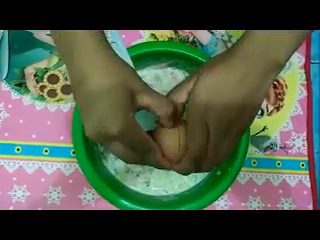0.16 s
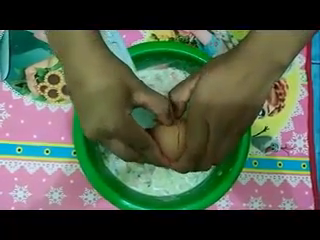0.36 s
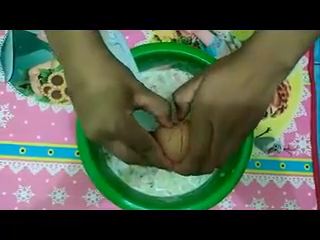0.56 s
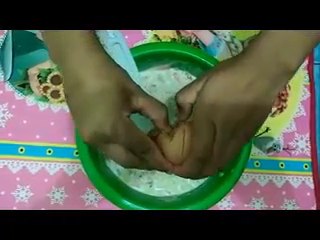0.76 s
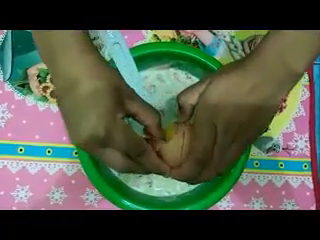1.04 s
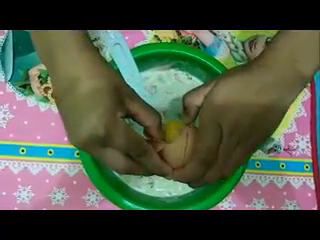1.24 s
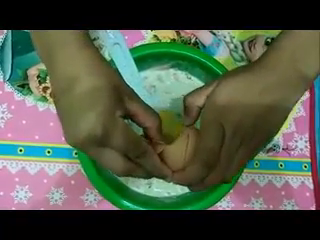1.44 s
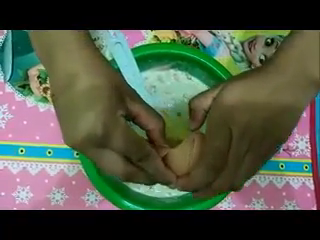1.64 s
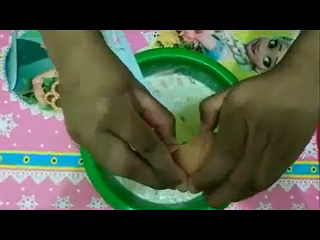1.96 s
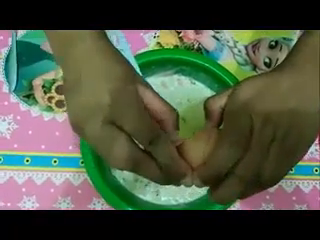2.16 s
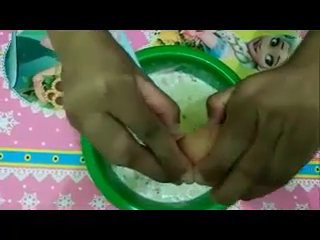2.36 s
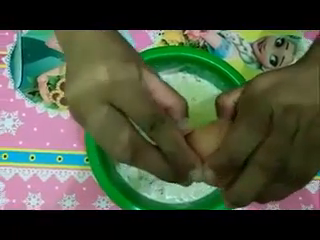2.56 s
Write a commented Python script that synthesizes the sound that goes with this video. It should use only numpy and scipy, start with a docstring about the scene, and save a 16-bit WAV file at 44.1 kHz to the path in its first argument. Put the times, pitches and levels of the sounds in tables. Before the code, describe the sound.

An egg is knocked on a plastic bowl, then its shell crunches and squelches apart

```python
"""Over a faint kitchen background with soft low bumps, an egg is knocked on the rim of a plastic bowl.
Thumbs then crunch into the shell and pull it apart: filtered noise impulses make snaps and crumbling.
Short tone bursts pop in the wet inside, and damped modes ring the bowl at each knock.
Swarms of tiny pops then squelch, lower on the whole as the shell opens; bowl air and room respond throughout.
The sound is close, and its top is cut steeply."""
import sys
import numpy as np
from scipy import signal
from scipy.fft import rfft, irfft, next_fast_len
from scipy.io import wavfile

SR = 44100
rng = np.random.default_rng(int(sys.argv[2]) if len(sys.argv) > 2 else 0)


def unload_audio(sound):
    """Save the sound as a 16-bit wav file, at the path given as the first command line argument."""
    columns = np.transpose(np.atleast_2d(sound))
    # keep every value between -1 and 1, then stretch to whole-number steps
    steps = np.round(np.clip(columns, -1, 1) * 32767)
    wavfile.write(sys.argv[1], SR, steps.astype(np.int16))


N = 119070
TIME = np.arange(N) / SR  # s


def from_db(db):
    """Logarithmic level: decibels become amplitude gain."""
    return 10 ** (np.asarray(db) / 20)


def rms_one(x):
    """Power normalisation: scale to unit root mean square."""
    return x / np.sqrt(np.mean(x ** 2) + 1e-20)


def at_hz(points, hz, axis=1):
    """Logarithmic frequency scale: interpolate a column of a table along it."""
    p = np.array(points)
    return np.interp(np.log(np.maximum(hz, 1)), np.log(p[:, 0]), p[:, axis])


def add(out, s, sound):
    """Superposition: mix a sound in at a time in seconds."""
    i = max(int(s * SR), 0)
    out[i:i + len(sound)] += sound[:max(N - i, 0)]


def colour(x, spectrum):
    """Minimum-phase filtering: a causal response from the cepstrum; white noise keeps its power."""
    size = 2 * next_fast_len(N)
    gain = rms_one(from_db(at_hz(spectrum, np.fft.rfftfreq(size, 1 / SR))))
    cepstrum = irfft(np.log(gain))
    # Folding the cepstrum onto positive time makes the filter causal
    cepstrum[1:size // 2] *= 2
    cepstrum[size // 2 + 1:] = 0
    return irfft(rfft(x, size) * np.exp(rfft(cepstrum)))[:N]


# steady background of the kitchen: (frequency [Hz], relative level [dB])
BACKGROUND_SPECTRUM = [(20, 0.5), (65, 1), (110, 0), (200, -8), (550, -12), (780, -0.5), (1050, -6),
                       (1400, -10), (2200, -22), (3500, -26), (10000, -28), (12000, -14)]
BACKGROUND_DB = -59
# faint hollow rush: (time [s], level [dB])
RUSH_LEVELS = [(0, -68.5), (.45, -63.5), (.7, -63), (1.95, -86.5), (2.35, -55.5), (2.46, -64), (2.55, -57),
               (2.7, -58.5)]
# colour of the hollow rush: (frequency [Hz], relative level [dB])
RUSH_SPECTRUM = [(150, -24), (450, -10.5), (690, -17), (765, 4.5), (850, -5.5), (1050, -15), (1700, -28.5),
                 (3000, -40)]
# soft low bumps: (time of the height [s], level [dB], Gaussian width [s], pitch [Hz])
BUMPS = [(0.041, -54.5, 0.0092, 95), (0.765, -51.5, 0.0085, 80), (2.185, -48, 0.013, 66),
         (2.262, -47, 0.027, 65.8), (2.315, -47, 0.023, 74), (2.419, -48.5, 0.0057, 69),
         (2.559, -45, 0.019, 68.6), (2.61, -48.5, 0.019, 68), (2.59, -56, 0.015, 193)]
BUMP_OVERTONE_RATIO, BUMP_OVERTONE_DB = 1.65, -14


def background():
    """Stationary noise and Gaussian tone bursts: steady air, a faint hollow rush and low bumps."""
    air = from_db(BACKGROUND_DB) * colour(rng.standard_normal(N), BACKGROUND_SPECTRUM)
    rush_level = from_db(np.interp(TIME, *np.transpose(RUSH_LEVELS)))
    out = air + colour(rng.standard_normal(N), RUSH_SPECTRUM) * rush_level
    for s, db, width, hz in BUMPS:
        phase = 2 * np.pi * hz * (TIME - s)
        tone = np.sin(phase) + from_db(BUMP_OVERTONE_DB) * np.sin(BUMP_OVERTONE_RATIO * phase)
        out += from_db(db) * np.exp(-.5 * ((TIME - s) / width) ** 2) * tone
    return out


# spells of fine crumbling as the shell gives way, before colouring:
# (time of the height [s], level [dB], rise time constant [s], fall time constant [s])
CRUMBLING = [(0, -60, .01, 0.036), (0.259, -23.5, 0.0058, 0.0062), (0.507, -50, 0.0084, 0.017),
             (0.624, -41, 0.0066, 0.011), (0.799, -25, 0.013, 0.021), (.94, -36, 0.047, 0.02),
             (0.984, -35, 0.0064, 0.029), (1.259, -37, 0.029, 0.047), (1.386, -43, 0.035, 0.042),
             (1.571, -40.5, 0.0072, 0.056), (1.792, -44.5, 0.014, 0.016), (2.021, -48, 0.0031, 0.0074),
             (2.174, -45.5, 0.05, 0.032)]
GRAINS_PER_S, GRAIN_SPREAD_DB = 800, 4.0  # mean rate; scale of the uneven sizes


def crunch():
    """Random impulse process: dense uneven grains build and die away with each press."""
    level = 0
    for s, db, rise, fall in CRUMBLING:
        level = level + from_db(db) * np.exp(-np.maximum((s - TIME) / rise, (TIME - s) / fall))
    sizes = from_db(GRAIN_SPREAD_DB * np.minimum(rng.exponential(1, N), 3))
    signed_sizes = sizes * rng.choice([-1, 1], N)
    grains = signed_sizes * (rng.random(N) < GRAINS_PER_S / SR)
    return level * rms_one(grains)


def burst(rise_s, decay_s):
    """Transient envelope: a rounded rise is followed by a free exponential decay."""
    t = np.arange(SR // 40) / SR
    rise = np.sin(np.pi / 2 * np.minimum(t / rise_s, 1)) ** 2
    return rise * np.exp(-np.maximum(t - rise_s, 0) / decay_s)


BREAKS_PER_S = 7000  # mean rate


def flurry(envelope):
    """Random impulse burst: separate tiny breaks of uneven size share their envelope's energy."""
    n = len(envelope)
    breaks = rng.standard_normal(n) * (rng.random(n) < BREAKS_PER_S / SR)
    return rms_one(envelope * breaks) * np.sqrt(np.mean(envelope ** 2))


# single fractures of the shell, before the trims below:
# (time [s], relative level [dB], body relative to bright edge [dB])
FRACTURES = [(0.1957, -37.5, -12), (0.223, -14, -9.5), (0.2448, -9, -8), (0.2513, -11, -11),
             (0.2538, -12, -5), (0.2576, -18.5, 3), (0.3793, -25.5, -6.5), (0.4909, -42.5, 0.5),
             (0.5563, -33.5, -10), (0.607, -30, -7.5), (0.6148, -29, -4), (0.626, -56, -22),
             (0.749, -24, -6), (0.7555, -45.5, 16), (0.767, -18, -18), (0.786, -17, -11), (0.796, -36, 1.5),
             (0.8055, -17.5, -3.5), (0.8411, -29, -7), (0.848, -26, -17), (0.8883, -20, -19),
             (0.8902, -23.5, -1), (0.9147, -17, -10.5), (0.946, -34, -3), (0.9587, -25.5, -6),
             (0.9692, -15, -28), (0.9714, -16, 2.5), (0.9712, -16.5, -22), (1.002, -39.5, 14),
             (1.073, -30.5, -7.5), (1.0828, -31.5, -28), (1.1764, -28, -6), (1.1877, -32, -7),
             (1.1923, -38, 3), (1.2259, -14.5, -3.5), (1.2451, -25.5, 5.5), (1.2694, -24, -3),
             (1.4038, -21.5, -7.5), (1.4135, -28, -9.5), (1.4454, -31.5, -2.5), (1.541, -27.5, -6.5),
             (1.5674, -20.5, -18), (1.6628, -40.5, -2.5), (1.6916, -37, -4.5), (1.7851, -30, -4),
             (1.79, -36, -1), (2.063, -42, -0.5), (2.1208, -14.5, -8), (2.1311, -20, -1),
             (2.1683, -17.5, -8.5), (2.2229, -16, -19), (2.2327, -21, -11), (2.4036, -39.5, -2.5),
             (2.496, -45, -11.5)]
SNAP_DB, SNAP_BODY_DB, CRUNCH_BODY_DB = -2.5, -2, -4  # trims: edge of snaps, body of snaps, body of crunch
SNAP_RISE_S, SNAP_DECAY_S = .0014, .0026  # decay is a time constant
# bright edge of breaking shell: (frequency [Hz], relative level [dB])
EDGE_SPECTRUM = [(3000, -20), (7000, -27), (8200, -7), (8900, -1), (9500, 2.5), (9950, -3), (10400, 1.5),
                 (11000, -13.5), (12000, -4)]
# duller body of breaking shell: (frequency [Hz], relative level [dB])
BODY_SPECTRUM = [(100, -24.5), (450, -11.5), (1100, -4.5), (1900, 0), (2650, -4), (3700, -11), (4400, -7),
                 (5700, -3.5), (7500, -3.5), (10000, -4.5)]


def shell():
    """Brittle fracture: flurries of tiny breaks and crumbling have a bright edge and a duller body."""
    edge, body = crunch(), from_db(CRUNCH_BODY_DB) * crunch()
    envelope = burst(SNAP_RISE_S, SNAP_DECAY_S)
    for s, db, body_db in FRACTURES:
        start = s - SNAP_RISE_S / 2
        add(edge, start, from_db(db + SNAP_DB) * flurry(envelope))
        add(body, start, from_db(db + body_db + SNAP_BODY_DB) * flurry(envelope))
    return colour(edge, EDGE_SPECTRUM) + colour(body, BODY_SPECTRUM)


# air resonances in the hollow of the bowl: (frequency [Hz], gain at resonance [dB], T60 [s])
AIR_RESONANCES = [(1387, -7.5, 0.055), (1856, -2.5, 0.2), (2134, -11.5, 0.2), (2520, -3, .09)]


def hollow(x):
    """Cavity resonance: narrow air modes of the bowl are set ringing by the egg."""
    t, response = TIME[:SR // 2], 0
    for hz, db, t60 in AIR_RESONANCES:
        unit_gain = 2 * np.log(1000) / (t60 * SR)  # makes the gain at resonance near one
        response = response + from_db(db - 60 * t / t60) * np.cos(2 * np.pi * hz * t) * unit_gain
    return signal.fftconvolve(x, response)[:N]


# reverberation of the kitchen: (frequency [Hz], relative level [dB], T60 [s])
REVERBERATION = [(300, -5, 0.39), (725, -14, 0.49), (1510, -7, 0.19), (2207, -11.5, 0.36),
                 (4140, -8.5, 0.29), (10800, -12, 0.22)]
ROOM_ONSET_S = .0014


def kitchen():
    """Diffuse reverberation: the noise response decays at its own rate in each octave."""
    t, response = TIME[:SR // 2], 0
    for low in 180 * 2. ** np.arange(6):
        centre = low * np.sqrt(2)
        octave = signal.butter(2, [low, 2 * low], "band", fs=SR, output="sos")
        band = signal.sosfilt(octave, rng.standard_normal(len(t)))
        decay = np.exp(-np.log(1000) * t / at_hz(REVERBERATION, centre, axis=2))
        envelope = decay * (1 - np.exp(-(t / ROOM_ONSET_S) ** 2))
        level = from_db(at_hz(REVERBERATION, centre))
        response = response + level * band * envelope / np.linalg.norm(envelope)
    return response


# small air pockets popping in the wet egg, before the trim: (time [s], relative level [dB], pitch [Hz])
AIR_POCKETS = [(0.223, -26.5, 1750), (0.7489, -33, 1730), (0.7852, -26, 1800), (0.7935, -28, 1640),
               (0.8009, -23, 1860), (0.8084, -27, 2020), (0.8481, -36, 1990), (0.8906, -28.5, 1560),
               (0.9149, -30, 1600), (0.9342, -30, 1860), (0.9457, -28, 1830), (0.9687, -56, 2030),
               (0.9923, -20.5, 1770), (0.9994, -24, 2090), (1.0203, -28.5, 1850), (1.1634, -36, 1510),
               (1.2262, -23, 1510), (1.2442, -22.5, 1470), (1.2887, -27, 1400), (1.2969, -29.5, 1400),
               (1.3664, -31, 1390), (1.3833, -25.5, 1350), (1.3838, -28.5, 2670), (1.3934, -28.5, 1390),
               (1.404, -29, 1400), (1.4859, -32.5, 1380), (1.4905, -35, 1890), (1.5426, -34, 1380),
               (1.543, -38.5, 2480), (1.581, -35.5, 1950), (1.6034, -28.5, 1390), (1.653, -38, 1880),
               (1.6885, -25, 1446), (1.694, -32.5, 1950), (1.6952, -27.5, 1395), (1.7037, -41, 1450),
               (1.7767, -27, 1380), (1.7898, -25, 1370), (1.7915, -36.5, 2440), (2.0629, -27.5, 1433),
               (2.0633, -31, 2270), (2.1215, -16, 1318), (2.1301, -49, 1830), (2.1625, -35, 1430),
               (2.1711, -12.5, 1316), (2.2184, -32, 1200), (2.2235, -27, 1280), (2.4031, -18, 1291)]
POP_DB = -3  # trim applied in scene()
POP_DELAY_S, POP_CYCLES = .0015, 1.875  # lag of the height; Gaussian width in cycles
POP_SAG_PER_S = 4  # fraction of the pitch lost per second
POP_OVERTONE_RATIO, POP_OVERTONE_DB = 1.95, -30


def pops(rows):
    """Bubble oscillation: each pocket swells and fades in a few cycles, with an overtone and a sagging pitch."""
    out = np.zeros(N)
    t = np.arange(-SR // 150, SR // 100) / SR
    for s, db, hz in rows:
        envelope = np.exp(-.5 * ((t - POP_DELAY_S) * hz / POP_CYCLES) ** 2)
        phase = 2 * np.pi * hz * t * (1 - POP_SAG_PER_S * t / 2)
        # The overtone is briefer than the fundamental
        overtone = from_db(POP_OVERTONE_DB) * envelope ** 2 * np.sin(POP_OVERTONE_RATIO * phase)
        add(out, s + t[0], from_db(db) * envelope * (np.sin(phase) + overtone))
    return out


# egg or fingers meet the rim: (time [s], relative level [dB])
RIM_CONTACTS = [(.2452, -29.5), (.2520, -22), (.2570, -22), (.6130, -34.5), (.6222, -37), (1.568, -38.5),
                (2.1715, -31.5)]
# modes of the plastic bowl: (frequency [Hz], relative level [dB], T60 [s])
BOWL_MODES = [(622, -3, 0.036), (772.6, 3.5, 0.026), (854, 4.5, 0.02), (1363, -24, 0.12),
              (1975, -3.5, .025), (2396, -1.5, .02), (2856, -1, .015)]
CONTACT_S = .005


def bowl():
    """Modal vibration: contacts with the rim, softened by the yielding shell, ring the damped plastic."""
    out, t = np.zeros(N), TIME[:SR // 4]
    ring = sum(from_db(db - 60 * t / t60) * np.sin(2 * np.pi * hz * t) for hz, db, t60 in BOWL_MODES)
    softened_ring = ring * np.minimum(t / CONTACT_S, 1)
    for s, db in RIM_CONTACTS:
        add(out, s, from_db(db) * softened_ring)
    return out


# squelching of the egg white: (time [s], level [dB], base pitch [Hz])
SQUELCHING = [(.73, -66.5, 1910), (0.801, -34.5, 2030), (.86, -77, 1850), (0.999, -37, 1925),
              (1.081, -63.5, 1460), (1.26, -52, 1390), (1.32, -55.5, 1420), (1.388, -40.5, 1468),
              (1.46, -59.5, 1406), (1.8, -50.5, 1362), (1.872, -77.5, 1437), (2.18, -50.5, 1340),
              (2.3, -67, 1270)]
# pocket sizes in the squelch: (pitch ratio [1], relative level [dB])
POCKET_SIZES = [(1, 2), (1.35, -5), (1.821, -11.5)]
SQUELCH_POPS_PER_S = 330  # for each pocket size
SQUELCH_SPREAD_OCT, SQUELCH_SPREAD_DB = .1, 4  # standard deviation of pitch; scale of random level


def squelch():
    """Bubble swarm: uneven tiny pops in three sizes, their pitch falling overall as the shell opens."""
    s, db, hz = np.transpose(SQUELCHING)
    times, swarm = np.arange(0, N / SR, 1 / SQUELCH_POPS_PER_S), 0
    for ratio, size_db in POCKET_SIZES:
        late, size, pitch = rng.standard_normal((3, len(times)))
        uneven_times = times + late / SQUELCH_POPS_PER_S
        levels = size_db + SQUELCH_SPREAD_DB * np.minimum(size, 2)
        pitches = ratio * np.interp(times, s, hz) * 2 ** (SQUELCH_SPREAD_OCT * pitch)
        swarm = swarm + pops(zip(uneven_times, levels, pitches))
    return rms_one(swarm) * from_db(np.interp(TIME, s, db))


def scene():
    """Linear superposition: shell, wet egg and bowl excite the bowl air and kitchen over the background."""
    floor, room = background(), kitchen()
    egg = shell() + from_db(POP_DB) * pops(AIR_POCKETS) + bowl() + squelch()
    reflections = signal.fftconvolve(egg, room)[:N]
    return (egg + hollow(egg) + reflections + floor)[None]


CUTOFF_HZ = 10800


def record(dry):
    """Low-pass filtering: a twelfth-order Chebyshev filter cuts the top steeply."""
    low_pass = signal.cheby1(12, .3, CUTOFF_HZ, fs=SR, output="sos")  # 0.3 dB passband ripple
    return signal.sosfilt(low_pass, dry)


dry = scene()
out = record(dry)
unload_audio(out)
```